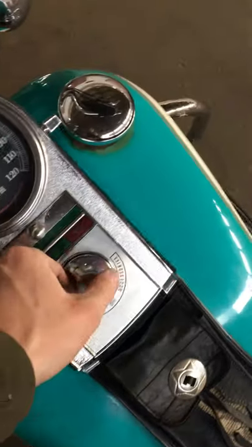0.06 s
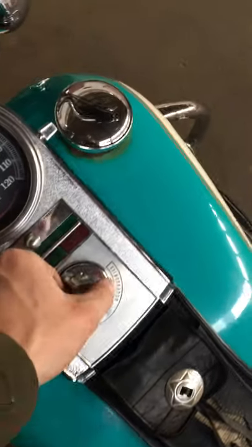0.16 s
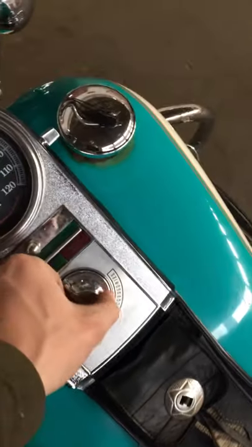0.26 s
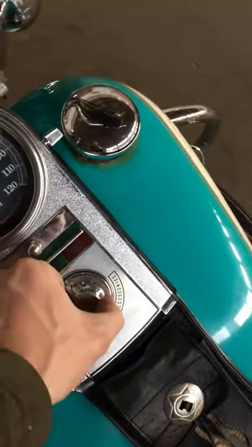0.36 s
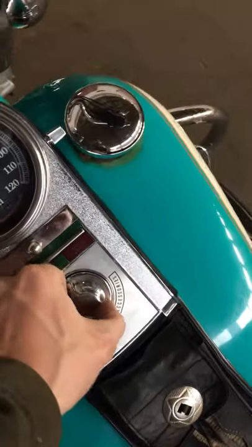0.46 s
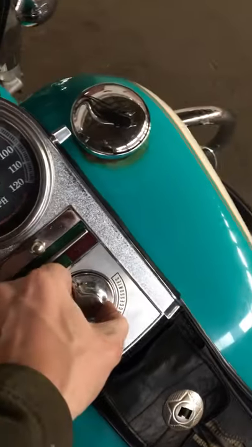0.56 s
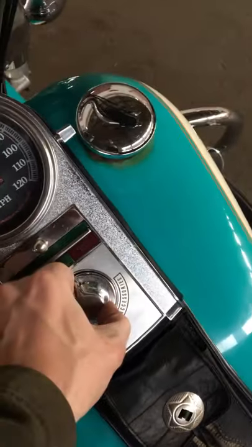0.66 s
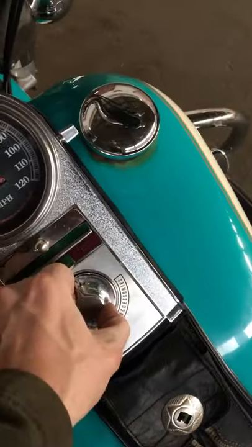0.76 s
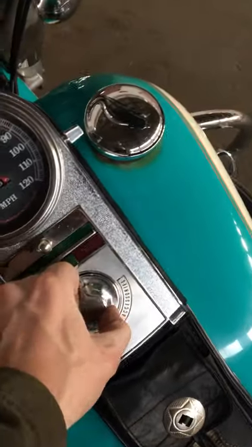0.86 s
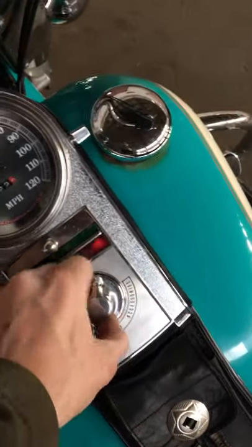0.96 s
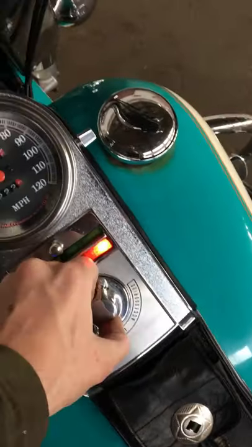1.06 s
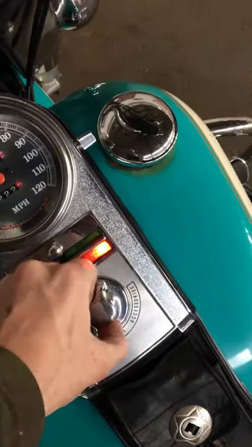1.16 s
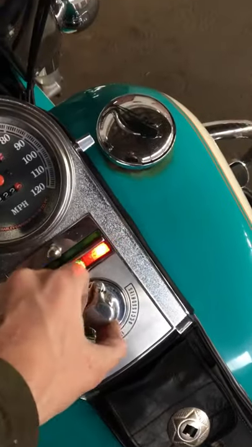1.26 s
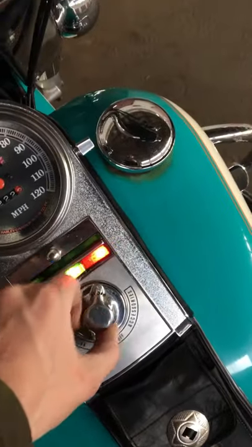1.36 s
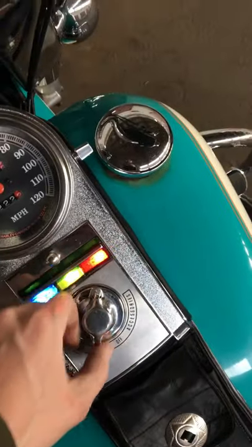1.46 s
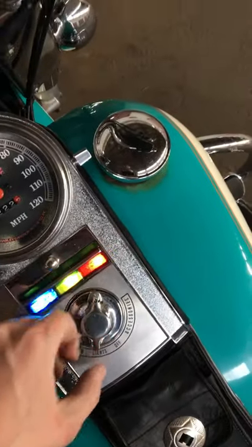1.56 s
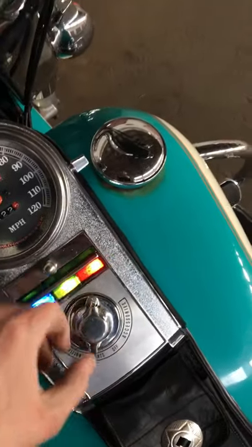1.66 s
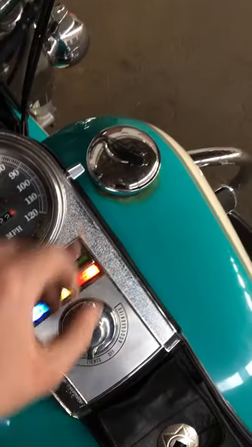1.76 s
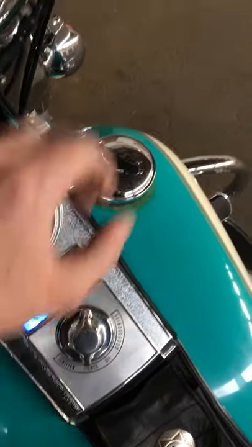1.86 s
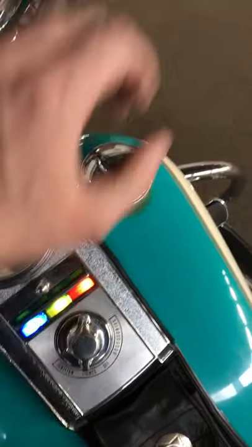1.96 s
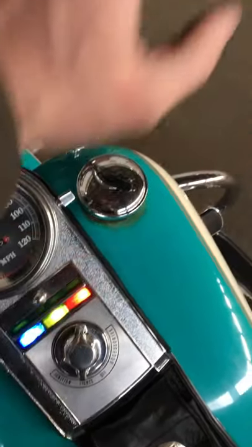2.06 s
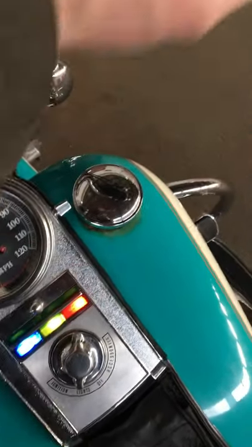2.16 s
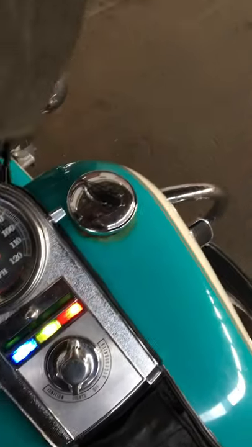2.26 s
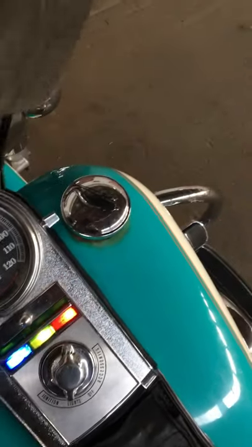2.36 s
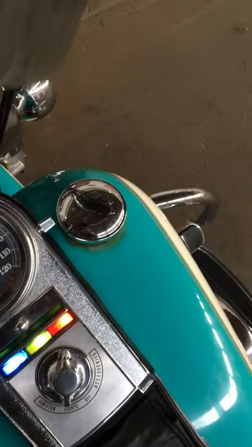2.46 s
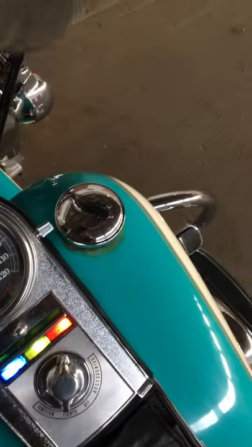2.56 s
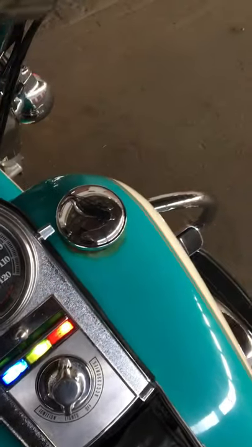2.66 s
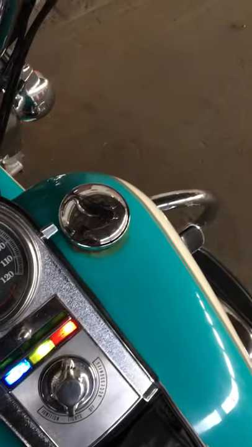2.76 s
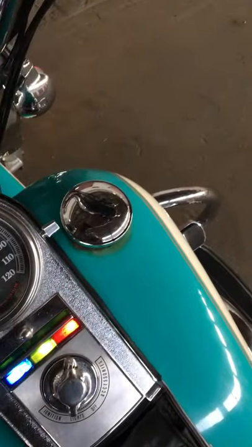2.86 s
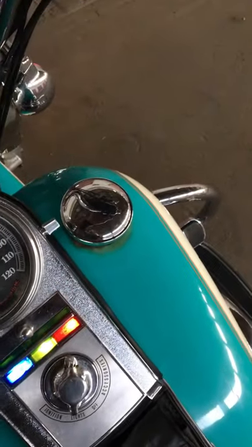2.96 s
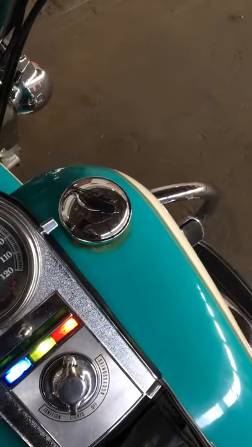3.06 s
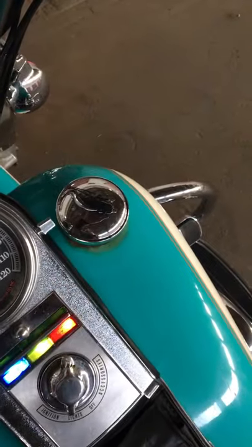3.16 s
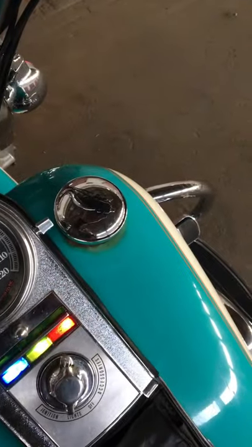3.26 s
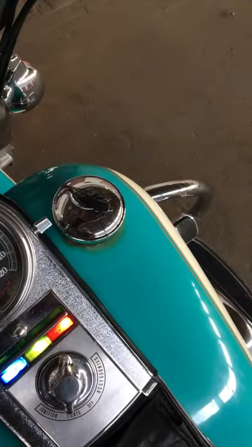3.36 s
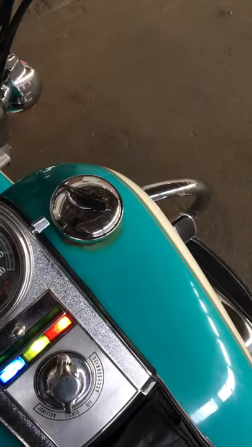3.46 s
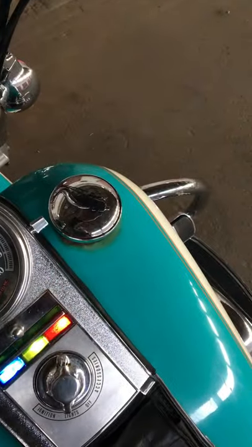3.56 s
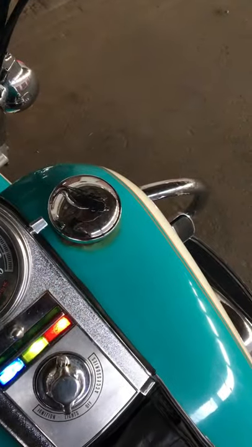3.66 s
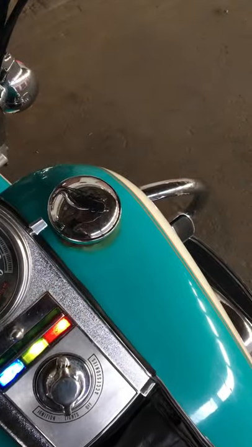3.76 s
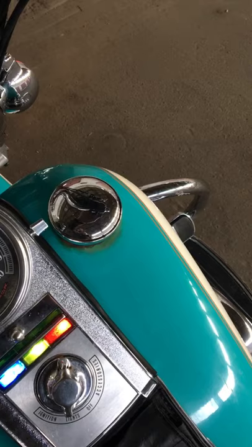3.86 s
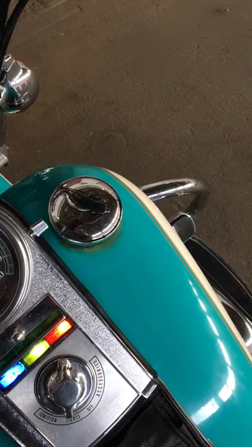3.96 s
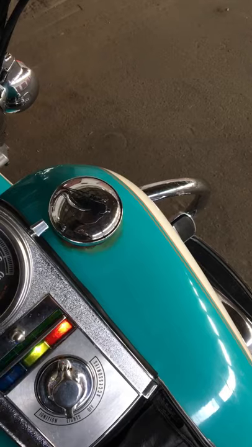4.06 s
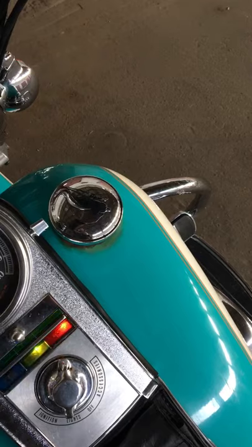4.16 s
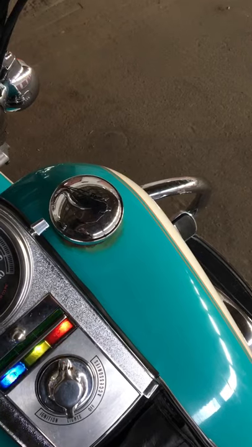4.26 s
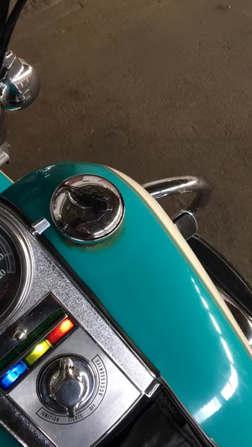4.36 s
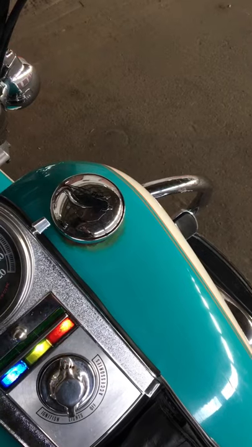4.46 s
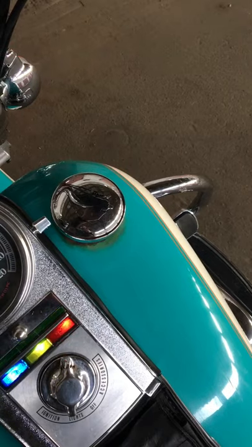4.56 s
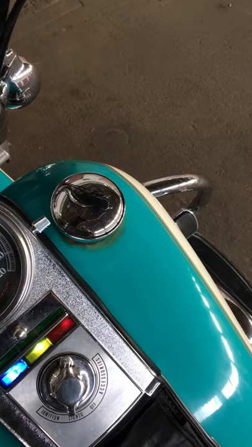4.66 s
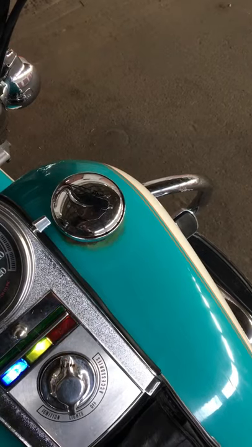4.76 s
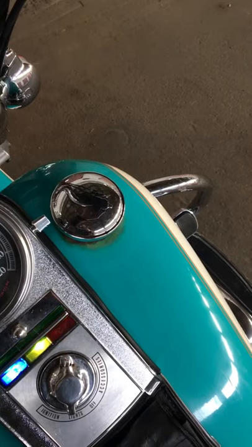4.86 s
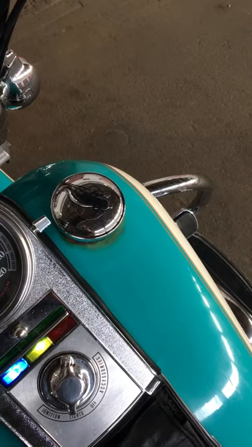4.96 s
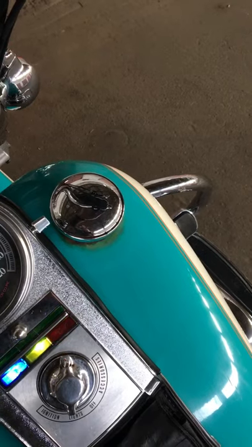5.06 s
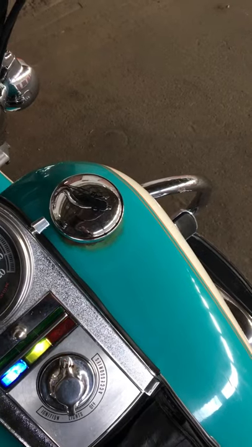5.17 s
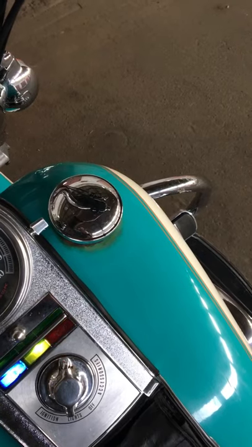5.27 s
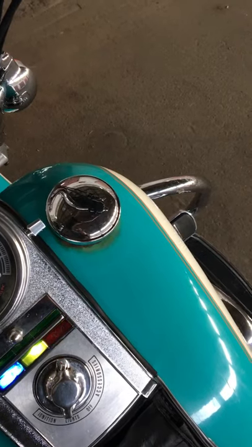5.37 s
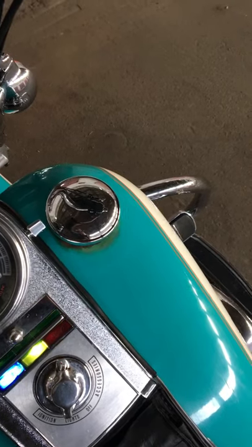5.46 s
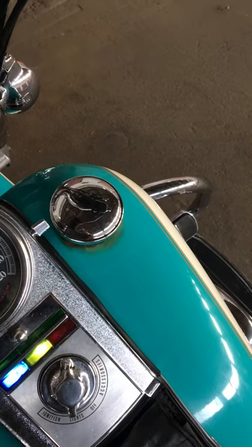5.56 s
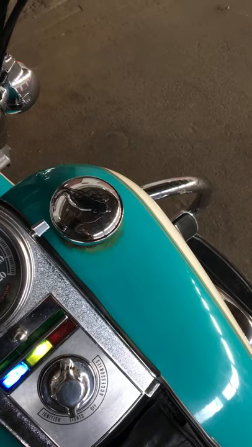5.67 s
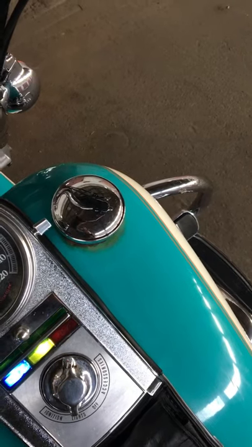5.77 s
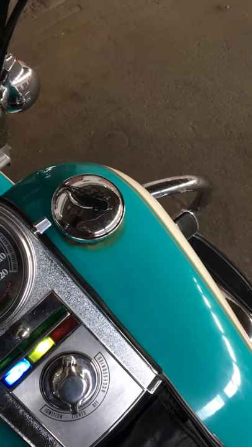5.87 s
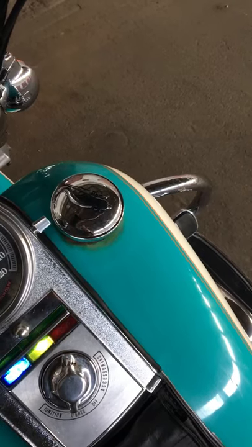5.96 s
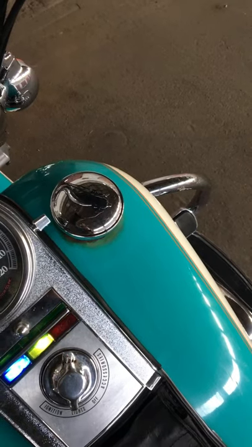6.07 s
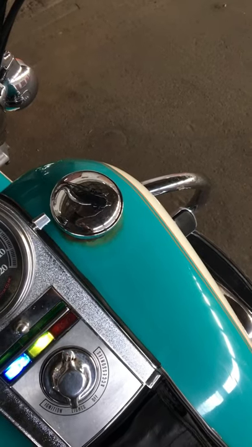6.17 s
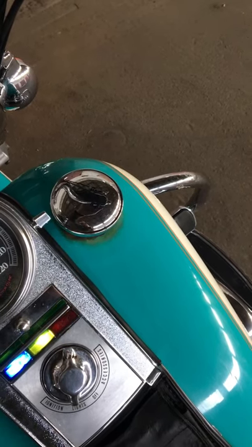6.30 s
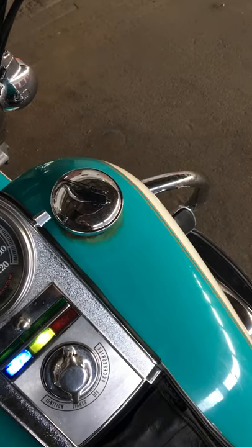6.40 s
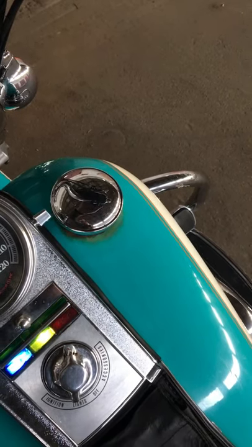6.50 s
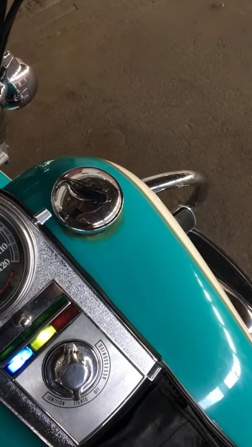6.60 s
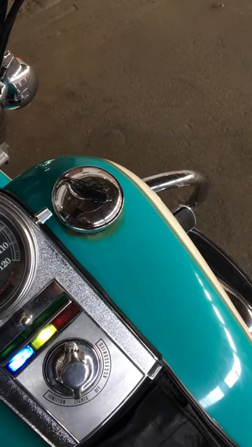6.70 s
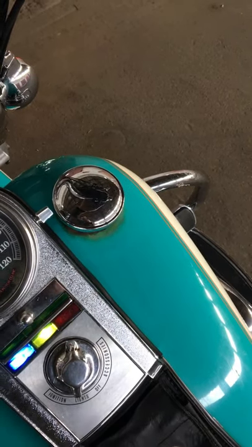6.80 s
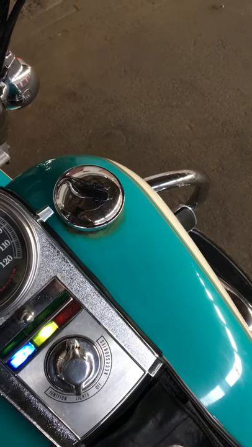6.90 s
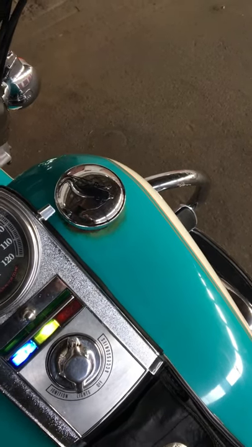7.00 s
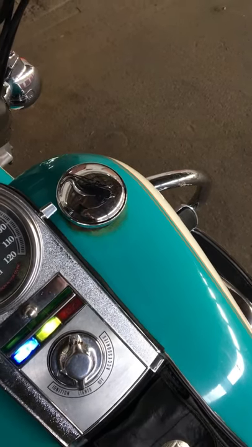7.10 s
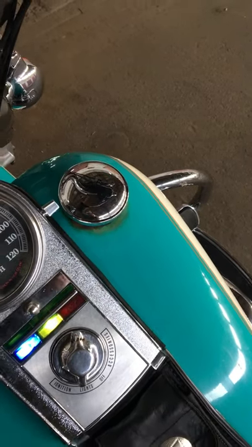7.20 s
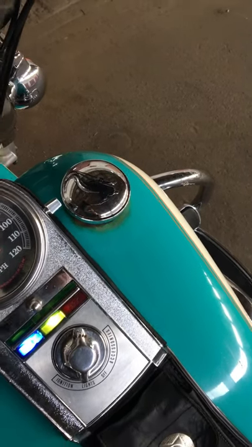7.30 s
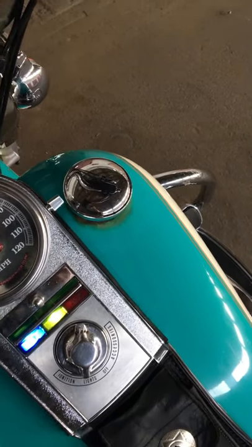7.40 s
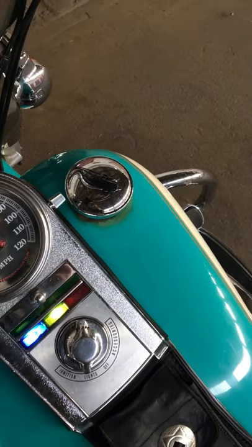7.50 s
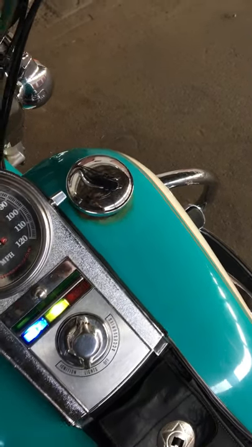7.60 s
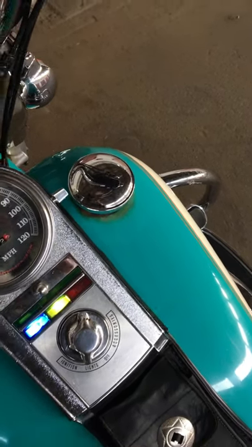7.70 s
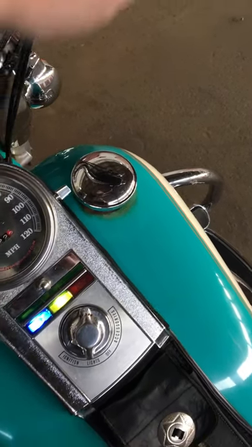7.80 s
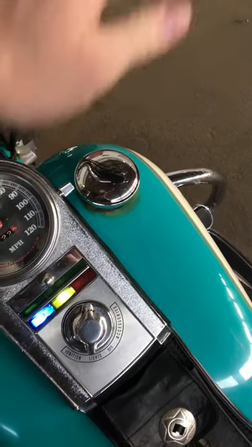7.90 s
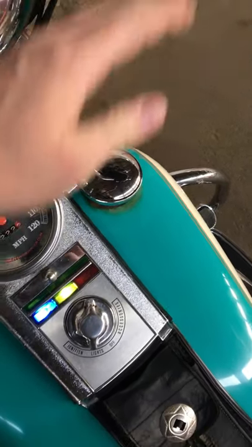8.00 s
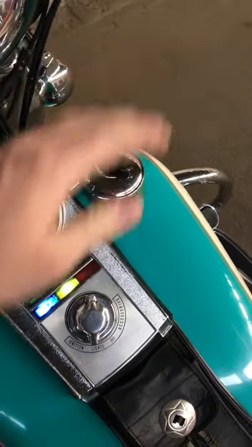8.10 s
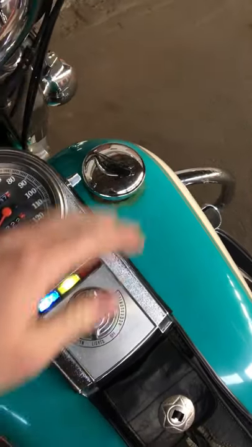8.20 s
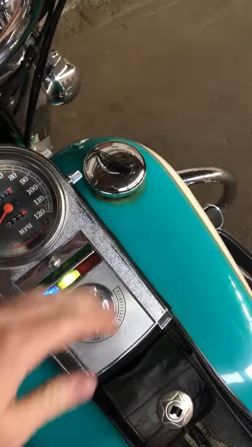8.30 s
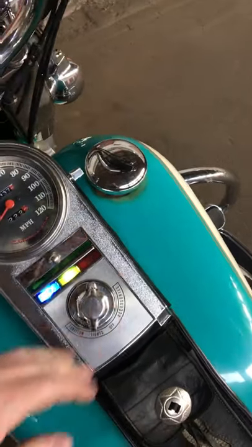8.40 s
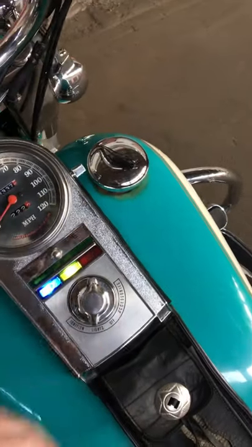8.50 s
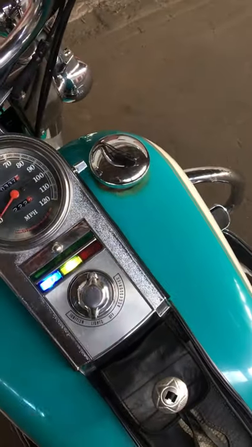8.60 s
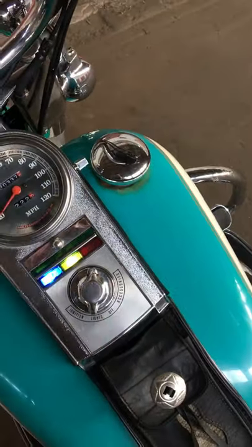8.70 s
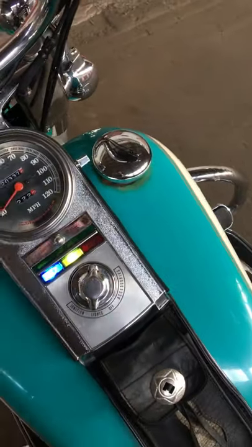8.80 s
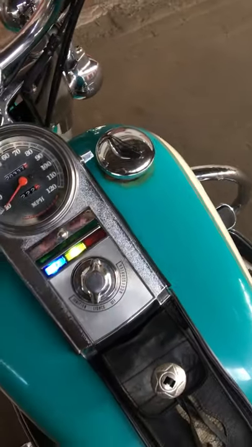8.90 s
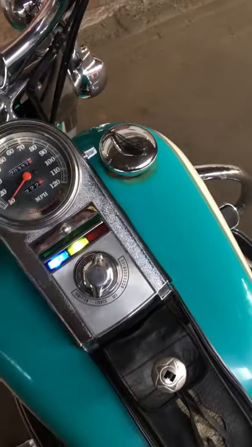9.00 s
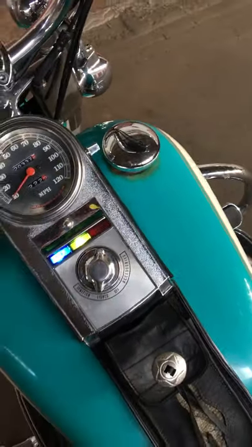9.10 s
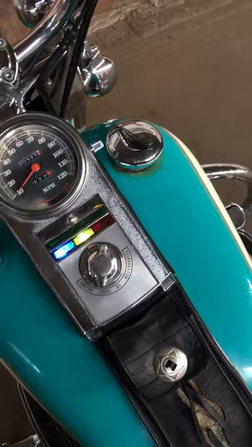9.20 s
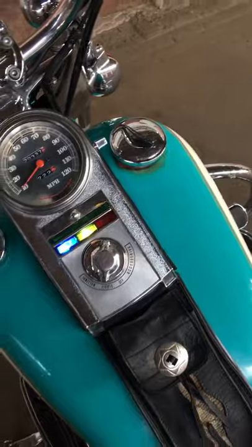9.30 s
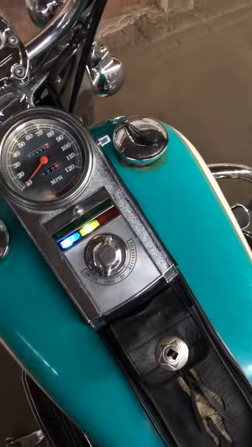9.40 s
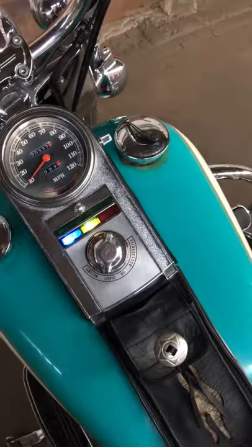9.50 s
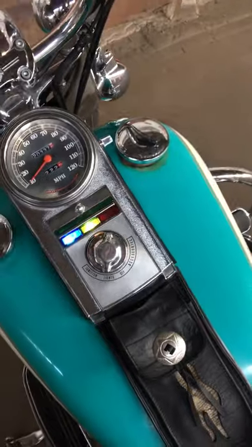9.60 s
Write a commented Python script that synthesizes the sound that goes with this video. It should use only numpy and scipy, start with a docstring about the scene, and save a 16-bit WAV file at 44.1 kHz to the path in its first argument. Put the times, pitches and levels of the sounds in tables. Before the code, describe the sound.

After a sharp switch click, a motorcycle's electric starter whines and the engine fires into a deep, lumpy idle.

```python
"""A big two-cylinder motorcycle starts up in a garage, heard from the saddle.
First the ignition switch snaps and a sleeve rustles, while traffic hums outside.
The electric starter knocks into gear, growls, skids on the engine's ring gear and spins down.
The cold engine idles unevenly: strong and weak puffs of gas thump down the pipes,
hard firings chirp and spit, and the valves tick."""
import numpy as np
import sys
import numpy as np
from scipy import signal
from scipy.fft import rfft, irfft, next_fast_len
from scipy.io import wavfile
from scipy.ndimage import uniform_filter1d, map_coordinates

SR = 44100
rng = np.random.default_rng(int(sys.argv[2]) if len(sys.argv) > 2 else 0)


def materialize(psi):
    """Save the field psi as 16-bit PCM at rate SR to the path in sys.argv[1].

    A 1-D psi becomes a single channel; in a 2-D psi each row is a channel.
    """
    bounded = np.clip(np.atleast_2d(psi).T, -1, 1)
    quanta = np.round(bounded * 32767).astype(np.int16)
    wavfile.write(sys.argv[1], SR, quanta)


N = 425565
T = np.arange(N) / SR
LONG_RING, SHORT_RING = 0, 1  # a long-ringing or a short-ringing thump
SPREAD_DB = 2.2  # chance change in strength

# Tone of far traffic: pitch_hz, level_db
TRAFFIC_TONE = [(15, -56.5), (25, -18), (123, -3.5), (156, -7), (189, -8.5), (216, -11), (283, -5),
                (413, -16.5), (602, -16), (746, -19), (1390, -23), (3030, -40), (5950, -53.5), (12000, -58),
                (15700, -61)]
# Loudness of far traffic: time_s, level_db
TRAFFIC_LEVEL = [(0, -43), (1.3, -42), (3.07, -42), (3.7, -43.5)]
# A car's tyres, dull and bright: pitch_hz, level_db
TYRES_DULL = [(300, -24.5), (700, -7.5), (860, 3), (1000, -4), (1300, -11), (3500, -58), (9000, -89.5)]
TYRES_BRIGHT = [(400, -28), (900, -9.5), (1060, -3.5), (1250, -10.5), (1600, -20.5), (4000, -38.5),
                (9500, -92.5)]
# Far machines: pitch_hz, level_db
HUM_TONES = [(91.5, -54), (183, -47.5), (301.5, -53), (624.5, -64)]
# Switch and finger clicks: start_s, level_db, ring_offset_db
CLICKS = [(.059, -43, -22.5), (.0902, -39, -23), (0.1163, -30, -26), (.297, -49, 0), (.4802, -34, -21.5),
          (.4923, -34.5, -24.5), (.6275, -50, -13), (0.9288, -2.5, -36), (.9324, -13.5, -10.5),
          (0.9526, -34.5, -7), (1.1065, -51, -11.5)]
# Ringing of the panel around the switch: pitch_hz, level_db, fade_s
PANEL_RING = [(612, -13, 0.027), (826, -22.5, 0.034), (973, 10, 0.06), (1120, 5, 0.068), (1218, 5, 0.084),
              (1480, -0.5, 0.083), (1816, 9.5, 0.029), (1990, 3.5, 0.025), (3040, -10.5, 0.017),
              (3900, -32, 0.0085), (7200, -10.5, 0.021)]
# Echo of the garage: pitch_hz, fade_s
WALL_FADE = [(300, 0.3), (1200, 1), (4000, 0.59), (8000, 0.5), (14000, 0.17)]
# Sleeve movements: start_s, level_db, fade_s
RUSTLES = [(1.553, -53.5, .11), (2.325, -65.5, 0.37), (2.566, -60, 0.17), (3.42, -66, .055),
           (3.668, -51.5, 0.082)]
# Tone of the cloth: pitch_hz, level_db
CLOTH_TONE = [(1500, -30), (3000, -15), (6300, 1.5), (8000, -5.5), (12000, -5.5), (15800, -15.5)]
# Knocks of the starter's magnet switch and small gear: start_s, level_db, fade_s
KNOCKS = [(3.989, -23, .038), (4.0008, -19.5, .036), (4.013, -14.5, .069), (4.2958, -14, .054),
          (4.3463, -15.5, .042), (4.413, -21, .055), (4.7431, -17.5, .13), (5.3202, -20.5, .074)]
# That gear skidding on the ring gear: start_s, level_db, length_s, first_tooth_hz, last_tooth_hz
SKIDS = [(4.957, -24, .036, 500.7, 455), (5.016, -22.5, 0.032, 443, 440.6),
         (5.186, -24, 0.042, 487.3, 455.3), (5.232, -29, 0.065, 449, 456.3),
         (5.269, -25.5, 0.03, 426.4, 429)]
# Ringing of the ring gear: pitch_hz, width_hz, level_db
GEAR_RING = [(972, 360, 11), (1300, 415, 13), (2260, 800, 9), (4420, 530, -1.5), (4560, 190, -13.5),
             (9100, 6960, -9)]
# The starter turning the engine: time_s, tooth_hz, growl_db, roughness (0 to 1), whir_db
CRANKING = [(4, 256.2, -28.5, 0.5, -34), (4.05, 262, -18.5, 0.68, -31.5), (4.11, 296.5, -21, 0.6, -28),
            (4.18, 298.2, -27.5, 0.8, -46.5), (4.25, 291.6, -21.5, .65, -32),
            (4.3, 315.5, -34.5, 0.7, -27.5), (4.35, 280.8, -14, 0.4, -24.5),
            (4.385, 253.3, -27.5, 0.7, -31.5), (4.43, 324, -23, .4, -26), (4.51, 301.9, -21.5, 0.29, -26.5),
            (4.6, 334, -24.5, 0.39, -25), (4.66, 306.5, -23.5, .85, -32), (4.72, 306, -28, .9, -32)]
# Ringing of the starter's housing: pitch_hz, width_hz, level_db
HOUSING_RING = [(249, 166, 5.5), (680, 106, 3), (1110, 330, -0.5), (2900, 610, -10)]
# Whine of the starter's spinning contacts: time_s, pitch_hz, level_db
WHINE = [(4.011, 543.7, -25.5), (4.098, 797.6, -30), (4.127, 652, -34), (4.255, 719, -38),
         (4.274, 1093, -59), (4.29, 1502, -39), (4.33, 1432, -23), (4.35, 1177, -21), (4.37, 959, -25),
         (4.4, 1214, -50), (4.5, 1400, -33), (4.6, 1482, -26), (4.66, 1470, -31)]
# The whine at 1, 2 and 3 times its pitch: offset_db
WHINE_PARTS = [3, -7, -9]
# Tone of the brushes rubbing those contacts: pitch_hz, level_db
BRUSH_TONE = [(410, -3), (700, -8.5), (1090, -5.5), (1210, -1.5), (1670, -8), (1830, -15), (2010, -11.5),
              (3750, -6.5), (4160, -5), (4560, -22), (5400, -13), (9210, -16), (10200, -20.5),
              (12300, -17.5), (15700, -26)]
# The starter's shell, rung by the brushes: pitch_hz, width_hz, level_db
SHELL_RING = [(1200, 94, -7), (1585, 40, -0.5), (2300, 500, -8.5), (3465, 26, -2.5), (3710, 80, -3),
              (3856, 86, -9), (4210, 60, -4.5), (4506, 105, -5), (4700, 60, -4)]
# Loudness of the engine between thumps: time_s, rumble_db, case_db
IDLE_LEVEL = [(4.22, -45, -60), (4.3, -34, -50), (4.6, -29, -38), (4.8, -26, -34), (5.4, -27, -35),
              (6.5, -28, -35.5), (9.65, -28, -35.5)]
# Rumble of pipes and room: pitch_hz, level_db
RUMBLE_TONE = [(25, -38), (40, -9.5), (58, 1.5), (80, 2), (110, -17), (135, -2), (157, -3.5), (185, -10),
               (230, -23), (400, -28.5), (600, -83.5)]
# Moving parts heard through the engine case: pitch_hz, level_db
CASE_TONE = [(150, -13), (250, -1.5), (443, -8), (527, -2), (901, -13), (1210, -8.5), (1340, -16),
             (1460, -14), (2460, -20), (3930, -26.5), (5000, -37), (5850, -32), (7850, -38.5),
             (11300, -39.5), (15700, -45.5)]
# Exhaust valve openings (the cold engine often misses):
# start_s, ring_length, pressure_db, chirp_db, spit_db
FIRINGS = [
    (4.263, LONG_RING, -21.5, -50, -45), (4.404, SHORT_RING, -9, -50, -45),
    (4.5637, LONG_RING, -8.5, -52.5, -50), (4.656, SHORT_RING, 2, -16, -16.5),
    (4.741, SHORT_RING, 4, -15, -15.5), (4.8158, SHORT_RING, -0.5, -40, -36),
    (4.8911, SHORT_RING, 1, -40, -33), (4.9616, LONG_RING, -13, -45, -42.5),
    (5.059, LONG_RING, 3.5, -21, -17.5), (5.1343, SHORT_RING, -7, -45, -33),
    (5.2047, LONG_RING, -6, -47, -35), (5.3223, SHORT_RING, -4, -45, -33),
    (5.4461, LONG_RING, 2.5, -32, -27), (5.6469, LONG_RING, -0.5, -27.5, -33),
    (5.7361, SHORT_RING, 0, -31, -22.5), (5.8528, LONG_RING, -7, -57, -45),
    (6.0328, LONG_RING, 1.5, -27, -24.5), (6.2285, LONG_RING, 0, -28, -40),
    (6.32, SHORT_RING, 1.5, -38, -27.5), (6.4194, LONG_RING, 1, -24.5, -36),
    (6.6265, LONG_RING, -1, -29, -37), (6.7103, SHORT_RING, -17, -35.5, -33),
    (6.8504, LONG_RING, 0.3, -22, -27.5), (6.9305, SHORT_RING, -35, -35, -35.5),
    (7.0772, LONG_RING, 0.3, -28, -31.5), (7.1817, SHORT_RING, -7, -52, -39),
    (7.2934, LONG_RING, -1.5, -26, -28), (7.391, SHORT_RING, 1, -55, -22),
    (7.492, LONG_RING, 2.5, -24.5, -24.5), (7.6948, LONG_RING, -0.3, -33, -29.5),
    (7.9193, LONG_RING, -0.7, -27, -31), (7.9947, SHORT_RING, -6.5, -48, -33),
    (8.1477, LONG_RING, -1.5, -33, -28.5), (8.2372, SHORT_RING, -1, -43, -21.5),
    (8.3501, LONG_RING, -2.5, -38, -34.5), (8.59, LONG_RING, -2.5, -31.5, -30),
    (8.811, LONG_RING, -0.5, -25, -25), (8.901, SHORT_RING, 1.5, -41, -24.5),
    (9.0083, LONG_RING, -7, -48, -42.5), (9.2267, LONG_RING, -1, -32, -35),
    (9.4509, LONG_RING, 0, -29, -30.5), (9.5439, SHORT_RING, -1.5, -44, -25.5)]
# The thump bouncing off a wall, long then short ring: delay_s, offset_db
WALL_BOUNCE = [(.056, -9.5), (.04, -8.5)]
# The rush of escaping gas, then two late returns in the pipe: delay_s, gain
PIPE_RETURNS = [(.0097, -.75), (.0303, .51), (.0437, .57)]
# Strength of the late returns, long then short ring: gain
LATE_GAINS = [0.96, 0.31]
# Deep ringing of the exhaust pipes: pitch_hz, width_hz, level_db
PIPE_RING = [(64.6, 46.4, 68), (68.7, 52.8, 68.5), (109, 12.9, 60.9)]
# The short first pipe, which sharpens the thump: pitch_hz, width_hz, level_db
FIRST_PIPE_RING = [(170, 61, 26)]
# Timing of chirp and spit against the thump, long then short ring: delay_s
CHIRP_DELAYS = [.0005, -.003]
# Ringing of the cylinder head: pitch_hz, width_hz, level_db
HEAD_RING = [(2320, 260, 17.5), (2910, 130, 18), (3220, 280, 7.5)]
# Gas hissing past a valve: pitch_hz, level_db
SPIT_TONE = [(300, 2), (800, -5.5), (2000, -16), (6000, -27.5), (10400, -25), (11500, -22.5),
             (15800, -33.5)]
# Valve ticks in each engine cycle: cycle_share (0 to 1), level_db
TICKS = [(.13, -37.5), (.355, -44), (.625, -36)]
# Tone of the ticks: pitch_hz, level_db
TICK_TONE = [(2500, 6.5), (4200, -1), (6200, 4.5), (8000, -5.5), (10500, -13), (13000, -10), (15800, -28)]


def amp(db):
    """Turn decibels into a gain."""
    return 10 ** (np.asarray(db) / 20)


def unit(x):
    """Scale x to an average power of 1."""
    return x / np.sqrt(np.mean(x ** 2) + 1e-20)


def along(points, hz):
    """Read between a table's pitches, on a log scale."""
    pitches, values = np.transpose(points)
    return np.interp(np.log(hz + 1), np.log(pitches + 1), values)


def curves(rows):
    """One value per sample for each column after the time."""
    s, *columns = np.transpose(rows)
    return [np.interp(T, s, column) for column in columns]


def wobble(rate):
    """A smooth curve through `rate` random points a second."""
    coarse = T[::32]
    points = rng.standard_normal(int(N * rate / SR) + 4)
    return np.interp(T, coarse, map_coordinates(points, [coarse * rate]))


def filtered(x, response):
    """Scale and shift each frequency of x by response(hz)."""
    size = next_fast_len(N + SR // 4)
    return irfft(rfft(x, size) * response(np.fft.rfftfreq(size, 1 / SR)), size)[:N]


def ringing(table):
    """The response of a ringing part; neighbouring pitches swing opposite ways."""
    return lambda hz: sum((-1) ** k * amp(db) * 1j * hz * width / (pitch**2 - hz**2 + 1j * hz * width)
                          for k, (pitch, width, db) in enumerate(table))


def noise(tone):
    """Noise of the given tone, at power 1."""
    return unit(filtered(rng.standard_normal(N), lambda hz: amp(along(tone, hz))))


def spikes(times, gains):
    """One spike at each time."""
    return np.bincount(np.round(np.asarray(times) * SR).astype(int), gains, N)[:N]


def bursts(times, gains, rise_s, fade_s):
    """A loudness curve that jumps at each time, then falls 60 dB in fade_s."""
    out, t = np.zeros(N + SR), T[:SR // 5]
    for s, gain, fade in np.broadcast(times, gains, fade_s):
        out[round(s * SR):][:len(t)] += gain * amp(-60 * t / fade) * (1 - np.exp(-t / rise_s))
    return out[:N]


def street(nearest_s=2.36, car_db=-44, fade_db_per_s=24, brighten_s=.89):
    """Far traffic and machines hum; one car swells, brightens and fades as it passes."""
    pass_db = car_db - fade_db_per_s * (np.hypot(T - nearest_s, .2) - .2)
    bright = np.clip(.49 + (T - nearest_s) / brighten_s, 0, .8)
    tyres = np.sqrt(1 - bright) * noise(TYRES_DULL) + np.sqrt(bright) * noise(TYRES_BRIGHT)
    car = amp(pass_db + .41 * wobble(7.3)) * tyres
    hum = sum(amp(db + 3 * wobble(2.8)) * np.sin(2 * np.pi * np.cumsum(hz + 1.5 * wobble(6)) / SR)
              for hz, db in HUM_TONES)
    traffic_db, = curves(TRAFFIC_LEVEL)
    return amp(traffic_db + 1.3 * wobble(5.1)) * noise(TRAFFIC_TONE) + car + hum


def ignition_switch():
    """Each click is a bright crack that rings the panel, never quite alike."""
    out, t = np.zeros(N + SR), T[:SR // 4]
    knob_band = signal.butter(1, [1500, 8000], "band", fs=SR)
    for s, db, ring_db in CLICKS:
        ring = sum(amp(level + rng.normal(0, SPREAD_DB) - 60 * t / fade) * np.sin(2 * np.pi * hz * t)
                   for hz, level, fade in PANEL_RING)
        ring *= 1 - np.exp(-t / .00021)
        snap = amp(-60 * t / .015) * (1 - np.exp(-t / .000098))
        crack = signal.lfilter(*knob_band, snap * rng.standard_normal(len(t)))
        out[round(s * SR):][:len(t)] += amp(db) * crack + amp(db + ring_db) * ring
    return out[:N]


def garage_echo(x):
    """The walls answer x; each pitch dies away at its own speed."""
    hz, t, spectrum = signal.stft(rng.standard_normal(SR // 2), SR, nperseg=256)
    tail = signal.istft(spectrum * amp(-60 * t / along(WALL_FADE, hz)[:, None]), SR, nperseg=256)[1]
    return signal.fftconvolve(np.pad(x, (300, 0)), tail / np.linalg.norm(tail))[:N]


def sleeve():
    """Cloth brushes softly as the arm moves."""
    s, db, fade_s = np.transpose(RUSTLES)
    return bursts(s, amp(db), rise_s=.0023, fade_s=fade_s) * noise(CLOTH_TONE)


def teeth(hz, jitter=.02):
    """One uneven tap for each passing gear tooth."""
    count = np.floor(np.cumsum(hz * (1 + jitter * wobble(90))) / SR)
    return unit(np.diff(count, prepend=0) * amp(SPREAD_DB * wobble(200)))


def skids():
    """How hard the starter's gear skids, and how fast the teeth pass."""
    strength, hz = np.zeros(N), np.zeros(N)
    for s, db, length, first_hz, last_hz in SKIDS:
        progress = (T - s) / length
        swell = amp(db) * np.clip(11 * progress, 0, 1) * np.clip(2.6 - 2.1 * progress, 0, 1)
        strength = np.maximum(strength, swell)
        hz = np.where(progress > 0, np.interp(progress, [0, 1], [first_hz, last_hz]), hz)
    return strength, hz


def starter_gear():
    """The small gear knocks into the ring gear and screeches when it skids."""
    s, db, fade_s = np.transpose(KNOCKS)
    strength, hz = skids()
    screech = strength * (teeth(hz) + .7 * rng.standard_normal(N))
    knocks = bursts(s, amp(db), rise_s=.0003, fade_s=fade_s) * rng.standard_normal(N)
    return filtered(screech + knocks, ringing(GEAR_RING))


def starter_growl():
    """Hard-working gear teeth shake the housing."""
    hz, db, rough, _ = curves(CRANKING)
    turning = (T > CRANKING[0][0]) & (T < CRANKING[-1][0])
    grind = (1 - rough) * teeth(hz) + rough * rng.standard_normal(N)
    return turning * amp(db) * unit(filtered(grind, ringing(HOUSING_RING)))


def starter_whine():
    """The spinning contacts sing, sagging in pitch as a piston squeezes its air."""
    first, last = WHINE[0], WHINE[-1]
    hz, db = curves([(first[0] - .03, first[1], -90)] + WHINE + [(last[0] + .025, last[1], -90)])
    phase = 2 * np.pi * np.cumsum(hz * (1 + .0116 * wobble(120))) / SR
    return sum(amp(db + part_db + SPREAD_DB * wobble(70)) * np.sin(k * phase)
               for k, part_db in enumerate(WHINE_PARTS, 1))


def starter_whir(on_s, coast_s=5.23, fade_db_per_s2=9):
    """The brushes spark, whir louder at each skid and fade ever faster as the motor coasts."""
    *_, whir_db = curves(CRANKING)
    level = amp(whir_db - fade_db_per_s2 * np.maximum(T - coast_s, 0) ** 2) + amp(-7.5) * skids()[0]
    level += bursts([on_s], amp(-11.5), rise_s=.0003, fade_s=.042)  # the spark
    shell = unit(filtered(rng.standard_normal(N), lambda hz: ringing(SHELL_RING)(hz) * (hz < 4800)))
    return level * amp(1.34 * wobble(45)) * (.95 * noise(BRUSH_TONE) + .81 * shell)


def starter_motor(on_s=4.0016):
    """The motor growls, whines and whirs once it gets current."""
    return (T > on_s) * (starter_growl() + starter_whine() + starter_whir(on_s))


def engine_rumble(thump):
    """The pipes' rumble and the noise of moving parts swell with each thump."""
    rumble_db, case_db = curves([(IDLE_LEVEL[0][0] - .05, -120, -120)] + IDLE_LEVEL)
    shake = unit(np.sqrt(np.abs(uniform_filter1d(thump ** 2, size=SR // 30))))
    rumble = amp(rumble_db + 2.2 * wobble(15)) * (1.37 + .15 * shake) * noise(RUMBLE_TONE)
    case = amp(case_db + 1.26 * wobble(25)) * (.7 + .29 * shake) * noise(CASE_TONE)
    return rumble + case


def in_cycle(share, settled_s=5.4, last_cycle_s=.21):
    """Times this share of the way between long-ringing thumps, once the idle has settled."""
    starts = np.array([s for s, ring_length, *_ in FIRINGS if ring_length == LONG_RING and s > settled_s])
    times = starts + share * np.diff(starts, append=starts[-1] + last_cycle_s)
    return times[times < T[-1]]


def exhaust(pump_db=-9, late_db_per_db=.5):
    """Each firing, its wall bounce and each weak pumping stroke is a soft thump in the pipes."""
    s, ring_length, db, *_ = np.transpose(FIRINGS)
    ring_length = ring_length.astype(int)
    bounce_s, bounce_db = np.transpose(WALL_BOUNCE)[:, ring_length]
    pumps = in_cycle(.71)
    # A firing's late returns follow its pressure only in part.
    late = np.take(LATE_GAINS, ring_length) * amp((late_db_per_db - 1) * db)
    late = np.concatenate([late, np.ones(len(s) + len(pumps))])
    db = np.concatenate([db, db + bounce_db, np.full(len(pumps), pump_db)])
    s = np.concatenate([s, s + bounce_s, pumps])
    (rush_s, rush_gain), *returns = PIPE_RETURNS
    push = spikes(s, amp(db)) + spikes(s + rush_s, rush_gain * amp(db))
    push += sum(spikes(s + delay, gain * late * amp(db)) for delay, gain in returns)
    boom = filtered(push, lambda hz: -ringing(PIPE_RING)(hz) / (1 + 1j * hz / 81.5) ** 2)
    rush = spikes(s + rush_s, amp(2.1 * db))  # strong firings snap far harder
    snap = filtered(rush, lambda hz: -ringing(FIRST_PIPE_RING)(hz) / (1 + 1j * hz / 350) ** 2)
    return boom + snap


def chirp_and_spit(ping_db=-38):
    """Hard firings ring the cylinder head and spit gas; squeezing the air adds a faint ping."""
    s, ring_length, _, chirp_db, spit_db = np.transpose(FIRINGS)
    s = s + np.take(CHIRP_DELAYS, ring_length.astype(int))
    pings = in_cycle(.88)
    blows = bursts(s, amp(chirp_db), rise_s=.0012, fade_s=.02)
    blows += bursts(pings, amp(ping_db + rng.normal(0, 3, len(pings))), rise_s=.0008, fade_s=.028)
    chirp = filtered(blows * rng.standard_normal(N), ringing(HEAD_RING))
    return chirp + bursts(s, amp(spit_db), rise_s=.0025, fade_s=.09) * noise(SPIT_TONE)


def valve_ticks():
    """The valves tick at set places in the cycle, never quite alike."""
    ticks = 0
    for share, db in TICKS:
        s = in_cycle(share)
        ticks += bursts(s, amp(db + rng.normal(0, SPREAD_DB / 2, len(s))), rise_s=.002, fade_s=.064)
    return ticks * noise(TICK_TONE)


def scene(walls_db=-19):
    """The motorcycle close by and the street outside; only the sharp sounds get the long echo."""
    thump = exhaust()
    sharp = ignition_switch() + chirp_and_spit() + starter_motor() + starter_gear()
    echo = amp(walls_db) * garage_echo(sharp)
    return (thump + sharp + echo + engine_rumble(thump) + valve_ticks() + street() + sleeve())[None]


def record(dry, ceiling=1.25, low_hz=26, top_hz=15800):
    """Round off the loudest peaks, then drop the deepest bass and the highest treble."""
    soft = dry / (1 + np.abs(dry / ceiling) ** 4) ** (1 / 4)
    return filtered(soft[0], lambda hz: (hz < top_hz) * hz ** 4 / (hz ** 4 + low_hz ** 4))[None]


dry = scene()
out = record(dry)
materialize(out)
```